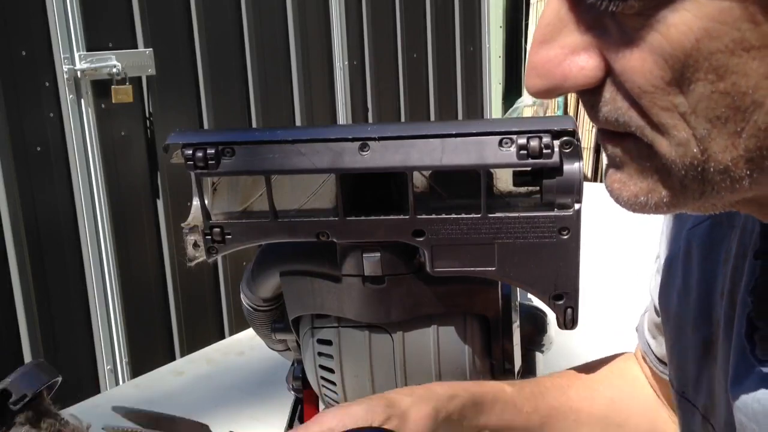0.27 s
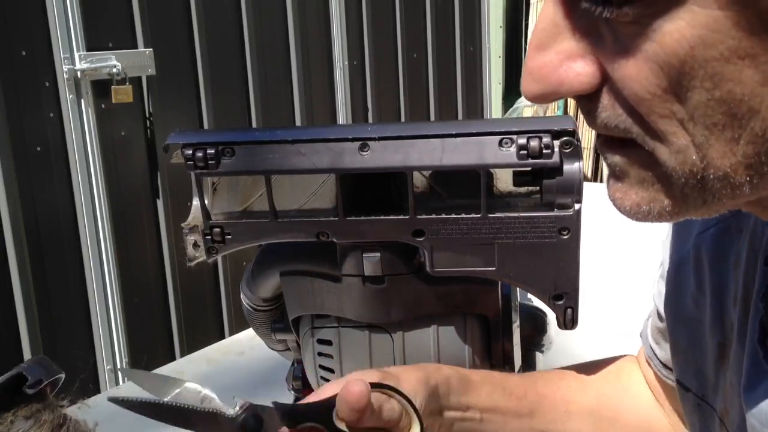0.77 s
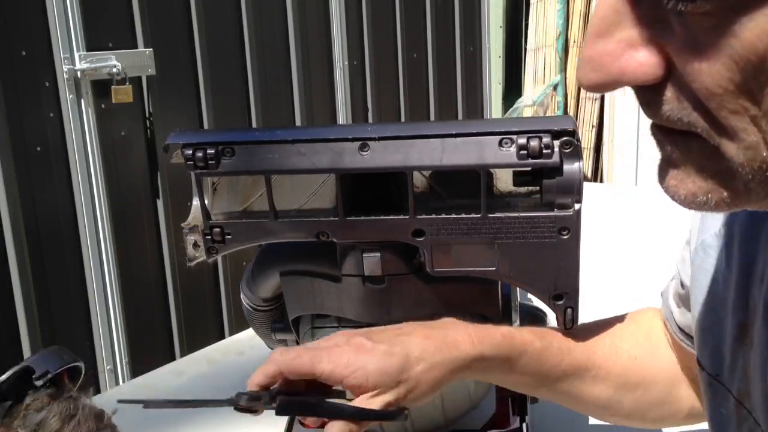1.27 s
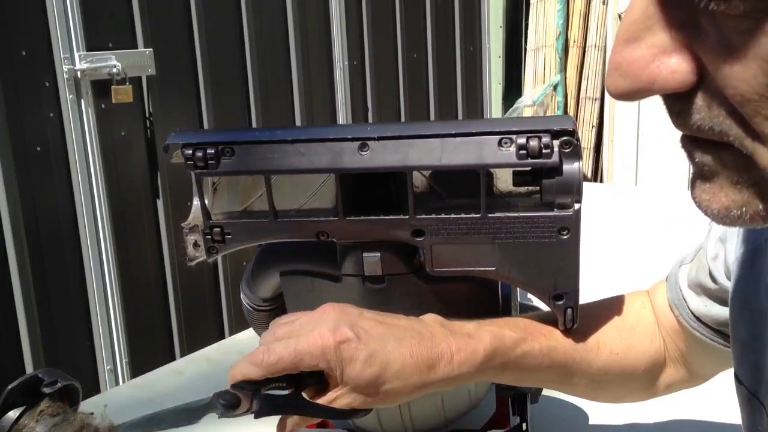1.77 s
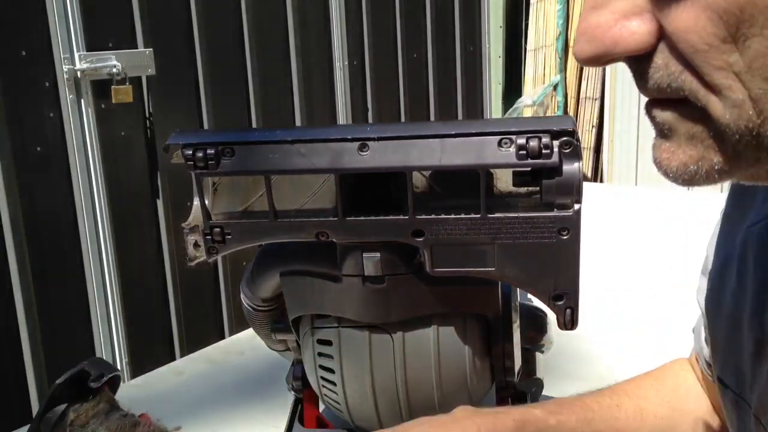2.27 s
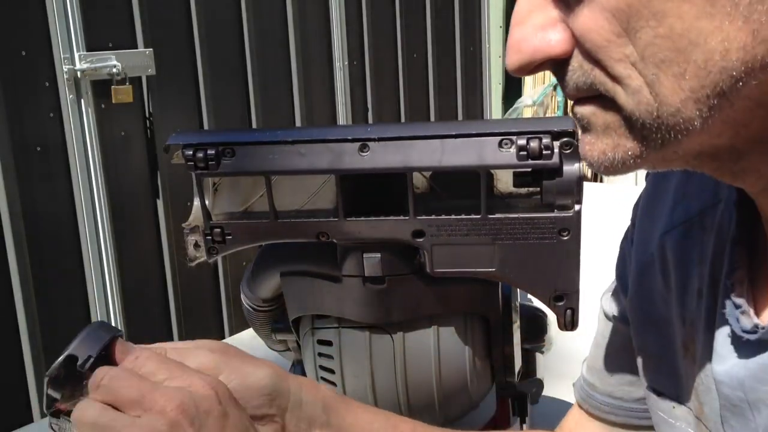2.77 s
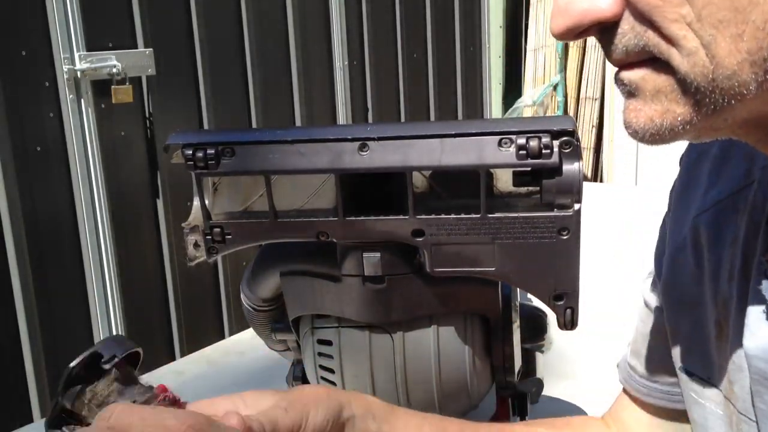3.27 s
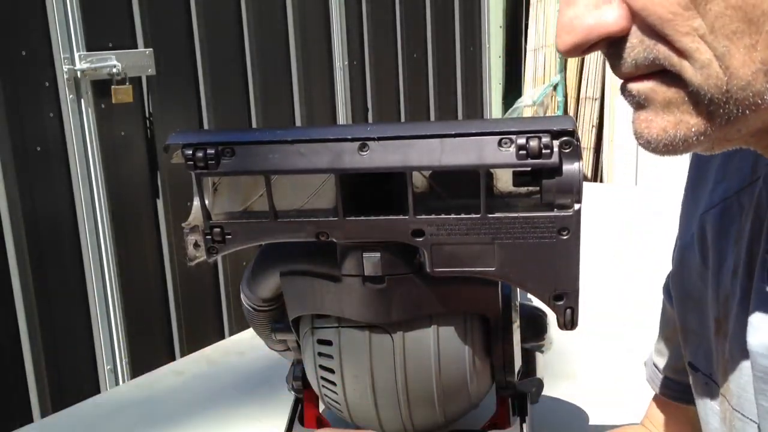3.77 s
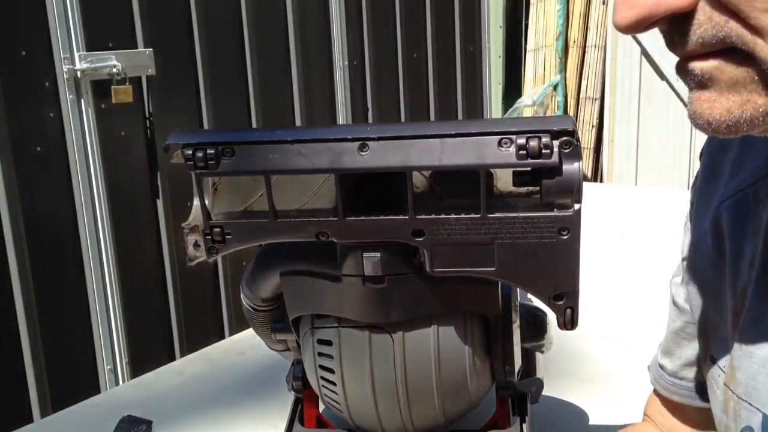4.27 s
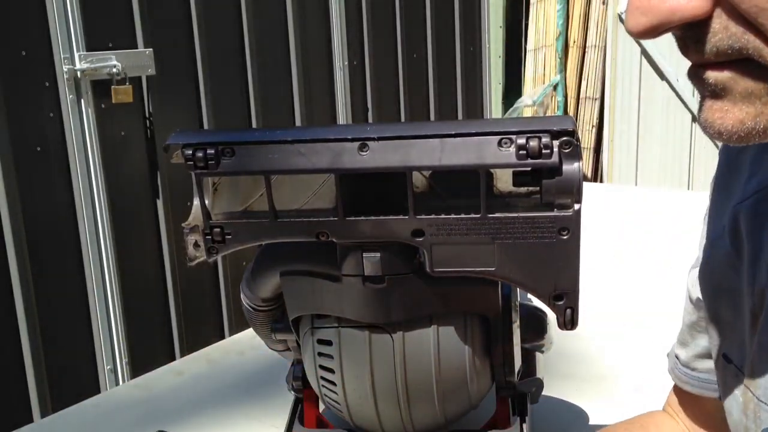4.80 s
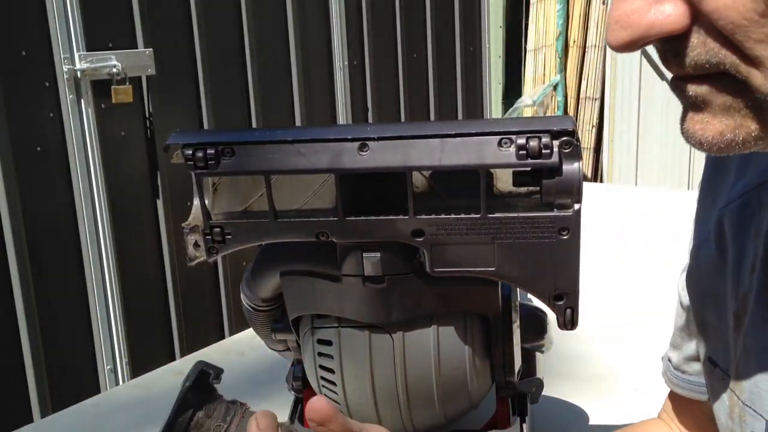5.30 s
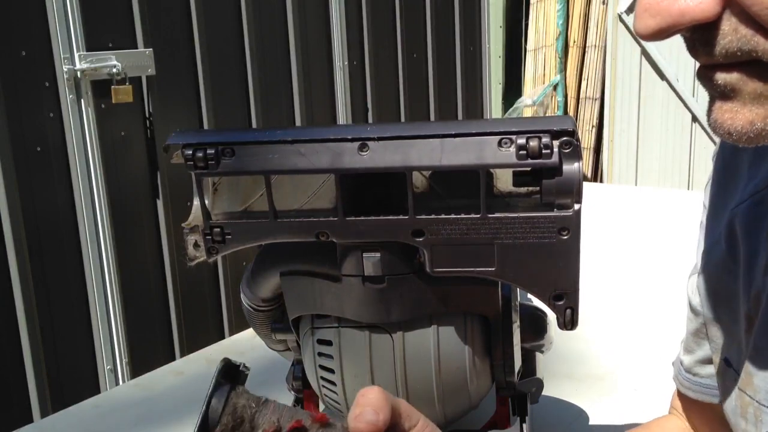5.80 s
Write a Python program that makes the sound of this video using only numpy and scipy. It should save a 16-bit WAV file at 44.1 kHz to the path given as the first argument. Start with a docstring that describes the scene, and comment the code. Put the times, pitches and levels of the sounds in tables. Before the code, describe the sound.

Short, sharp scissor snips and a clatter as they drop, followed by faint crackly hair tearing and a few plastic knocks outdoors.

```python
"""Scissors snip hair off a plastic brush bar, steel clicking on steel, and drop on a light table.
Fingers then tear the hair away in rubs and ticks; the bar slides and knocks on the table top.
Each impact excites damped normal modes, and friction radiates noise from many tiny slips.
Outdoors, a quiet yard hums behind it all, and a near wall reflects the clicks and blows."""
import sys
import numpy as np
from scipy import signal
from scipy.fft import rfft, irfft, next_fast_len
from scipy.io import wavfile
from scipy.ndimage import uniform_filter1d, map_coordinates

SR = 44100
rng = np.random.default_rng(int(sys.argv[2]) if len(sys.argv) > 2 else 0)


def unload_audio(sound):
    """Save the sound as a 16-bit wav file, at the path given as the first command line argument."""
    columns = np.transpose(np.atleast_2d(sound))
    # keep every value between -1 and 1, then stretch to whole-number steps
    steps = np.round(np.clip(columns, -1, 1) * 32767)
    wavfile.write(sys.argv[1], SR, steps.astype(np.int16))


N = 266628

# normal modes of the bar on the table: f/Hz, level/dB, T60/s
BAR_MODES = [(165, -24.5, 0.1), (298.7, -13, 0.12), (393, -1, 0.07), (643, 0.5, 0.055), (810, -10.5, 0.021),
             (1170, -9.5, 0.035), (1288, -7, .04), (1668, -18, 0.045), (1823, -7, .05), (2020, -18.5, .06),
             (2200, -18.5, .05), (2800, -19, .05)]


def amp(db):
    return 10 ** (np.asarray(db) / 20)


def unit(x):
    return x / np.sqrt(np.mean(x ** 2) + 1e-20)


def along(points, hz):
    """Interpolation of (f/Hz, value) points on a logarithmic frequency axis."""
    f, v = np.transpose(points)
    return np.interp(np.log(hz + 1), np.log(f + 1), v)


def filtered(x, response):
    """Linear filtering: the spectrum of x times a frequency response."""
    m = next_fast_len(len(x) + 8192)
    return irfft(rfft(x, m) * response(np.fft.rfftfreq(m, 1 / SR)), m)[:len(x)]


def noise(spectrum, size=N):
    """White noise shaped by (f/Hz, level/dB) points, then scaled to rms 1."""
    return unit(filtered(rng.standard_normal(size), lambda hz: amp(along(spectrum, hz))))


def wobble(rate):
    """Smooth random modulation: a spline with rate knots a second."""
    knots = rng.standard_normal(int(N * rate / SR) + 4)
    return map_coordinates(knots, [np.arange(N) * rate / SR])


def resonance(hz, centre_hz, q):
    """Response of a damped oscillator, gain 1 at its centre."""
    damping = 1j * hz * centre_hz / q
    return damping / (centre_hz ** 2 - hz ** 2 + damping)


def ringing(modes, t, scatter_db, slow=1, cutoff_hz=1e5):
    """Free vibration as a sum of damped modes; a soft blow barely excites those above the cutoff."""
    return sum(amp(db + rng.normal(0, scatter_db) - 60 * t / (t60 * slow)) / (1 + (hz / cutoff_hz) ** 2)
               * np.sin(2 * np.pi * hz * t) for hz, db, t60 in modes)


def add(track, s, sound):
    """Superposition of a sound on the track from time s."""
    part = track[round(s * SR):][:len(sound)]
    part += sound[:len(part)]


def click(t, hz, t60, q):
    """A transient: decaying noise through one broad resonance, without bass, peak rms 1."""
    burst = amp(-60 * t / t60) * rng.standard_normal(len(t))
    centre_hz = np.clip(hz, 500, 16000)
    burst = filtered(burst, lambda f: resonance(f, centre_hz, q) * (1j * f / (1j * f + 1500)) ** 2)
    return burst / np.sqrt(np.max(uniform_filter1d(burst ** 2, size=40)))


def yard():
    """Ambient noise: broadband hiss and far traffic drone, with the line spectrum of mains hum."""
    # course of the background: t/s, hiss level/dB, drone level/dB
    levels = [(0, -60.5, -66), (.7, -60.5, -64.5), (1.3, -60, -65), (1.6, -61, -66), (2.2, -61.5, -65),
              (2.6, -59, -64.5), (3.1, -60, -65.5), (3.6, -59, -66), (4.199, -59.5, -63.5),
              (4.75, -59.5, -66.5), (5.402, -58.5, -66), (6.05, -60.5, -65)]
    # spectra of hiss, traffic and mains: f/Hz, level/dB
    hiss = [(760, -37), (1300, -11.5), (1550, -8.5), (1720, -20), (2540, -3), (2880, -3.5), (3550, -3.5),
            (4320, -4.5), (4900, -5.5), (6710, -6), (7220, -2.5), (9870, -4.5), (13200, -5.5),
            (15200, -5.5), (15800, -16)]
    traffic = [(15, -64), (25, -33.5), (96, -16.5), (172, -10.5), (296, -8), (357, -8), (393, -9),
               (501, -4.5), (560, -8.5), (604, -4), (2200, -8), (2860, -35.5), (4840, -120)]
    mains = [(120, -85), (179, -82), (361, -84.5)]
    s, hiss_db, drone_db = np.transpose(levels)
    t = np.arange(N) / SR
    out = amp(np.interp(t, s, hiss_db) + .4 * wobble(10)) * noise(hiss)
    out += amp(np.interp(t, s, drone_db) + .8 * wobble(9)) * noise(traffic)
    for hz, db in mains:
        out += amp(db + 2.5 + wobble(5)) * np.sin(2 * np.pi * hz * t + 1.3 * wobble(18))
    return out


def wall(x):
    """Reflection: the near wall returns a delayed, thin, dull tail, formed by convolution."""
    delay_s, t60 = 0.025, 0.083
    t = np.arange(SR // 6) / SR
    tail = noise([(300, -24.5), (2000, 1.0), (6000, 2.0), (12000, -15.5)], len(t)) * amp(-60 * t / t60)
    return signal.fftconvolve(np.pad(x, (round(delay_s * SR), 0)), tail / np.linalg.norm(tail))[:N]


def narrow_hisses():
    """Narrow-band noise: faint hisses and whistles from rubbed hair and the sliding bar."""
    # noise bands: t/s, duration/s, f/Hz, level/dB, half-width/Hz
    bands = [(3.91, .045, 14500, -62, 500), (4.02, .14, 1650, -65, 20), (3.69, .36, 388, -68, 12),
             (3.57, .2, 7800, -65, 400)]
    out = np.zeros(N)
    for start, length, hz, db, width_hz in bands:
        swell = np.sqrt(np.abs(np.sin(np.linspace(0, np.pi, round(length * SR)))))
        band = filtered(rng.standard_normal(SR // 2), lambda f: np.exp(-((f - hz) / width_hz) ** 2))
        add(out, start, amp(db) * unit(band)[:len(swell)] * swell)
    return out


def sliding_bar():
    """Forced vibration: sliding friction drives the modes of the bar, over a low rumble."""
    t = np.arange(N) / SR
    start, end, jerk_s = 3.69, 4.18, 0.022
    sliding = uniform_filter1d(1. * ((t > start) & (t < end)), size=400)
    modes = lambda f: sum(amp(db / 5.3) * resonance(f, hz, q=11) for hz, db, _ in BAR_MODES)
    hum = unit(filtered(rng.standard_normal(N), lambda f: 0.21 * (f < 2000) + modes(f)))
    rumble = noise([(30, -34), (90, -3), (200, -2.0), (400, -17.5)]) * amp(-65 + 4.4 * wobble(15))
    friction = amp(np.interp(t, (start, end), (-73, -68)))
    jerk = amp(-57 - 20 * np.abs(t - start) / jerk_s)
    return sliding * ((friction + jerk) * hum + rumble)


def table_thuds():
    """Heavily damped modes of the table top give low, dull thuds, one under the bar's knock."""
    # thuds: t/s, level/dB, f/Hz
    thuds = [(1.953, -37, 208), (1.981, -47, 173), (2.438, -45.5, 188), (2.668, -34, 165),
             (3.297, -50.5, 178), (3.902, -53, 110.3), (4.354, -46.5, 126), (5.699, -31, 130),
             (5.737, -23.5, 217), (5.745, -31.5, 149.5), (5.912, -50.5, 201)]
    rise_s, t60 = 0.0047, 0.092
    out, t = np.zeros(N), np.arange(SR // 3) / SR
    for s, db, hz in thuds:
        phase = 2 * np.pi * hz * t
        swing = np.sin(phase) + 0.2 * np.sin(1.6 * phase) + 0.49 * np.sin(0.573 * phase)
        add(out, s, amp(db - 60 * t / t60) * (1 - np.exp(-(t / rise_s) ** 2)) * swing)
    return out


def blows(events, modes, shiver_db, low_hz, crack_db):
    """Impact excitation: the object rings and the table top shivers, its bass lasting longest."""
    # spectrum of the shivering top: f/Hz, level/dB
    top_spectrum = [(35, -42.5), (60, -17.5), (190, -20.5), (858, 3.5), (1220, -1.5), (1560, -4),
                    (2430, -5.5), (9200, -20), (12000, -40.5), (15600, -79), (22000, -120)]
    # decay of the top: f/Hz, T60/s
    top_decay = [(100, 0.38), (500, 0.078), (2000, 0.089), (8000, 0.12)]
    out, t = np.zeros(N), np.arange(SR // 5) / SR
    for s, db, cutoff_hz, slow in events:
        hz, frames, spectra = signal.stft(noise(top_spectrum, len(t)), SR, nperseg=128)
        decay = amp(-60 * frames / (slow * along(top_decay, hz)[:, None]))
        excitation = 1 / (1 + (hz[:, None] / cutoff_hz) ** 2)
        shiver = signal.istft(spectra * decay * excitation, SR, nperseg=128)[1][:len(t)]
        sound = ringing(modes, t, 0.8, slow, cutoff_hz) + amp(shiver_db) * shiver
        sound += amp(crack_db) * click(t, hz=1.5 * cutoff_hz, t60=0.016, q=1.3)
        add(out, s, amp(db - 6.5) * sound * (1 - np.exp(-t / 0.00073)))
    # a thin top radiates little bass
    return filtered(out, lambda f: (1j * f / (1j * f + low_hz)) ** 2)


def knocking_bar():
    """Impacts on the table set the plastic bar in free vibration."""
    # knocks: t/s, level/dB, cutoff f/Hz, factor on T60
    knocks = [(4.9533, 4, 1500, 0.67), (5.53, -10, 1501, 0.64), (5.6927, -7, 1805, 0.58)]
    return blows(knocks, BAR_MODES, shiver_db=-3, low_hz=170, crack_db=-19)


def rub(strokes, spectrum, slips_per_s, grain_db):
    """Stick-slip friction: tiny uneven slips over a hiss; rise and fall times span 20 dB of a stroke."""
    # low part of a rub: f/Hz, level/dB
    body_spectrum = [(300, -87), (700, -2.5), (1500, -1.5), (3000, -1), (5000, -39)]
    roundness, slip_s = 1.2, 0.0018  # roundness 1 gives a pointed swell, 2 a rounded one
    envelope, body, t = np.zeros(N), np.zeros(N), np.arange(N) / SR
    for s, db, rise, fall, body_db in strokes:
        force = amp(db - 20 * np.where(t < s, (s - t) / rise, (t - s) / fall) ** roundness)
        envelope += force
        body += force * amp(body_db)
    slipping = 0
    for centre_hz in (4500, 8000, 13000):  # thick, middle and fine strands slip independently
        slips = (rng.random(N) < slips_per_s / SR) * amp(grain_db * rng.standard_normal(N))
        grains = unit(signal.lfilter([1], [1, -np.exp(-1 / (slip_s * SR))], slips))
        band = lambda hz: amp(along(spectrum, hz)) * np.exp(-(np.log((hz + 1) / centre_hz) / .45) ** 2)
        slipping += filtered((grains + 1) * rng.standard_normal(N), band)
    return envelope * unit(slipping) + body * noise(body_spectrum)


def tearing_hair():
    """Friction of hair pulled off the bristles: sparse slips make a coarse rustle."""
    # pulls: peak t/s, level/dB, rise/s, fall/s, relative body level/dB
    pulls = [(2.88, -61.5, 0.29, .3, -17), (3.034, -52.5, 0.056, 0.054, -27),
             (3.252, -53.5, 0.08, 0.054, -13), (3.315, -58.5, 0.036, .03, -20),
             (3.696, -48.5, 0.0099, 0.024, -23), (3.72, -61.5, 0.34, 0.39, -23),
             (3.93, -61.5, 0.17, 0.11, -9.5), (4.012, -62, 0.033, 0.032, -21),
             (4.317, -31, 0.037, 0.033, -21), (4.384, -51.5, 0.027, 0.078, -8.5),
             (4.49, -56, 0.08, 0.027, -17), (4.646, -51, 0.062, 0.057, -19.5),
             (5.078, -45.5, .09, 0.042, -16), (5.206, -44, 0.014, 0.041, -14),
             (5.45, -49, 0.013, 0.043, -25.5), (5.532, -44.5, .016, 0.023, -24),
             (5.695, -40.5, 0.076, 0.049, -20.5), (5.79, -52.5, 0.035, .047, -9.5),
             (5.838, -56, 0.018, 0.15, -21), (5.908, -42, 0.029, 0.051, -8.5)]
    # spectrum of rubbed hair: f/Hz, level/dB
    spectrum = [(1180, -44), (2000, -5.5), (2700, 3.5), (2990, -7.5), (3230, -2), (3900, -9.5),
                (4320, -4.5), (5740, -6.5), (6410, -1.5), (7050, -4), (10200, -4), (11500, -8),
                (13100, -5.5), (15500, -12)]
    return rub(pulls, spectrum, slips_per_s=400, grain_db=7.0)


def snapping_strands():
    """Sudden release of tension: each hair or bristle lets go with one dry tick."""
    # loudest strands: t/s, level/dB, centre f/Hz
    snaps = [(2.6916, -45.5, 5810), (2.8854, -49.5, 8370), (3.0402, -40.5, 6450), (3.24, -46, 7900),
             (3.249, -45, 3300), (3.5559, -42.5, 7600), (3.695, -36, 8800), (3.7188, -43.5, 3730),
             (3.7195, -43, 8500), (3.737, -43, 10270), (3.7414, -42.5, 6570), (3.7631, -43, 7300),
             (3.78, -44, 10200), (3.8004, -48, 9900), (3.818, -43, 8820), (4.2747, -43, 7950),
             (4.2832, -36.5, 9100), (4.3031, -30, 13050), (4.3207, -30, 10300), (4.3803, -35.5, 5700),
             (4.3944, -37, 7270), (4.4007, -42, 5500), (4.4158, -41, 5800), (4.9965, -45.5, 12300),
             (5.016, -48, 7850), (5.037, -40, 7760), (5.0674, -38, 7940), (5.0824, -39.5, 5380),
             (5.1726, -41, 9060), (5.1784, -40.5, 7530), (5.2067, -37, 3840), (5.226, -38, 11300),
             (5.4517, -39.5, 4640), (5.453, -37, 8470), (5.6805, -41.5, 4550), (5.766, -44.5, 10550),
             (5.7833, -41.5, 4790), (5.8318, -47, 7300), (5.8386, -39, 7350), (5.8988, -41, 8100),
             (5.9044, -35.5, 3170), (5.935, -40.5, 10160)]
    # spells of picking at fainter strands: start t/s, end t/s, mean level/dB
    spells = [(2.94, 3.11, -47), (3.6, 3.69, -49), (3.819, 3.9, -51), (4.191, 4.28, -47), (5.79, 5.95, -46)]
    picks, picks_per_s, pick_hz = 20, 41, 8500
    out, t = np.zeros(N), np.arange(SR // 50) / SR
    ticks = list(snaps)
    for start, end, db in spells:
        times = start + (np.arange(picks) + rng.random(picks)) / picks_per_s
        size, pitch = rng.standard_normal((2, picks))
        levels = db + 0.5 * size - 100 * (times > end)  # inaudible past the end of the spell
        ticks += zip(times, levels, pick_hz * np.exp(.2 * pitch))
    for s, db, hz in ticks:
        add(out, s, amp(db) * click(t, hz, t60=.009, q=2.9))
    return out


def dropped_scissors():
    """Each landing and rebound excites the normal modes of the scissors on the table."""
    # landings: t/s, level/dB, cutoff f/Hz, factor on T60
    landings = [(2.1915, 0, 2700, 0.27), (2.203, -11, 2620, 0.65), (2.2935, -23, 1300, 0.43),
                (2.3175, -21.5, 1600, 0.29), (2.33, -35, 1000, 0.72), (2.345, -30.5, 1000, 0.86),
                (2.3602, 1, 1500, 0.32), (2.3652, 0.5, 2500, 0.43), (2.372, -8, 2500, 0.42),
                (2.3775, -20.5, 1800, 0.91), (2.3865, -7, 2500, 0.57), (2.4005, -21, 2500, 0.82)]
    # scissors on the table: f/Hz, level/dB, T60/s
    modes = [(198, -8.0, 0.055), (638.3, 2.0, 0.013), (1136, -4.0, 0.094), (1681, -15.5, 0.11),
             (2040, -20.0, 0.05), (2540, -14.5, 0.066), (3100, -21, 0.084), (3670, -15.0, 0.08),
             (4440, -11.5, 0.082), (4893, -27.0, 0.072), (315.3, -6, 0.15), (401, -4.5, 0.1),
             (1012, -6.0, 0.063)]
    return blows(landings, modes, shiver_db=3.5, low_hz=100, crack_db=-22.5)


def shearing_blades():
    """Friction of blades shearing hair: dense slips merge into a fine rasp."""
    # cuts: peak t/s, level/dB, rise/s, fall/s, relative body level/dB
    cuts = [(.033, -53, 0.026, .016, -12), (.153, -58, .005, .012, 1), (.178, -57, .02, .02, -9),
            (.272, -45, 0.014, 0.039, -4.5), (.648, -50, .012, 0.015, -11), (.69, -52, 0.01, .08, -22),
            (.742, -45, 0.014, 0.0047, -10.5), (.922, -46.5, .004, 0.032, -4.5),
            (1.107, -43.5, 0.02, 0.0043, -9), (1.503, -57, .02, .025, -13),
            (1.887, -36, 0.0082, 0.0055, -8), (1.915, -43.5, 0.026, 0.031, -25),
            (1.958, -39.5, 0.0084, 0.012, -4.5)]
    # spectrum of the rasp: f/Hz, level/dB
    spectrum = [(1180, -19), (2000, -20), (3320, -2.5), (3740, 2), (5890, -3.5), (6690, -2.5), (7230, -8),
                (10600, -3), (15500, -14)]
    return rub(cuts, spectrum, slips_per_s=1400, grain_db=8.5)


def snips():
    """Impact of steel on steel: a crack, free vibration of edges and blades, a loose pivot's rattle."""
    # blade and pivot clicks: t/s, level/dB, centre f/Hz, relative bite/dB, relative rattle/dB
    contacts = [(.147, -44, 3480, -16, -12), (0.466, -36.5, 5060, -26, -7), (.701, -43.5, 5000, -9, -14),
                (0.737, -52, 8150, -9, -24), (.741, -46, 4840, -21, -23), (.7417, -24.5, 10600, -28, -23),
                (.9176, -35, 3200, -15, -9), (1.082, -49, 9000, -8, -8), (1.1053, -34.5, 10930, -10, -9),
                (1.1794, -12, 5650, 7, -11.5), (1.2035, -37, 6400, -8, -10), (1.214, -44, 4240, -14, -12),
                (1.4605, -36, 3650, -22, -5.5), (1.7322, -44.5, 6300, -12, -9.5),
                (1.8864, -18, 13200, -26, -32), (1.911, -36.5, 7730, -6, -11),
                (1.929, -34.5, 6760, -1, -14), (1.956, -45, 10230, -9, -12),
                (1.9609, -37.5, 4280, -11, -11), (2.192, -16.5, 3946, -8.5, -5.5),
                (2.2025, -25.5, 8500, 3.5, -23), (2.207, -30.5, 7840, -3.5, -18.5),
                (2.286, -38, 9030, -7.5, -13.5), (2.294, -43.5, 4424, -5, -13.5),
                (2.317, -47.5, 3520, -9.5, -16), (2.365, -10, 6830, 2, -5), (2.372, -22, 8020, -6, -7),
                (2.3868, -15.5, 4940, -4.5, -14), (2.4, -34, 3540, -1.5, -13), (2.4956, -41, 3280, 2.5, -7)]
    # modes of the meeting edges and of the blades: f/Hz, level/dB, T60/s
    edge_modes = [(2030, -14, .012), (2750, -9, .012), (5950, 0, .009), (6900, -3, .009), (9200, -9, .006),
                  (12600, -5, .007), (14300, -9, .005)]
    blade_modes = [(2029, -19.5, 0.058), (2820, 1.5, 0.071), (3870, 3.5, 0.017), (4310, -7.5, 0.05),
                   (4940, -32, 0.031), (6700, -2.5, 0.026), (9600, -13, .03), (12080, -23, .035)]
    # spectrum of the pivot's rattle: f/Hz, level/dB
    pivot = [(470, -47.5), (800, -16), (1420, -18), (1600, -22), (1810, -13.5), (3130, -6), (4320, -3.5),
             (13000, -17.5), (15500, -24.5)]
    rattle_t60 = .058
    out, t = np.zeros(N), np.arange(SR // 10) / SR
    for s, db, hz, bite_db, rattle_db in contacts:
        bite = amp(bite_db) * ringing(edge_modes, t, scatter_db=1) * (1 - np.exp(-t / .0006))
        ring_db = -12 - 18 * np.log2(hz / 4000)  # brighter clicks ring less
        ring = amp(ring_db) * ringing(blade_modes, t, scatter_db=2)
        rattle = noise(pivot, len(t)) * amp(rattle_db - 60 * t / rattle_t60) * (1 - np.exp(-t / 0.00067))
        crack = click(t, hz, t60=0.004, q=0.52)
        add(out, s, amp(db) * (crack + bite + ring + rattle))
    # thin blades radiate no bass
    return filtered(out, lambda f: (1j * f / (1j * f + 700)) ** 3)


def scene():
    """Superposition of all sources in one channel; only the hard impacts reflect from the wall."""
    impacts = snips() + dropped_scissors() + knocking_bar()
    rubs = shearing_blades() + tearing_hair()
    mix = impacts + amp(-29.5) * wall(impacts) + rubs + snapping_strands()
    return (mix + table_thuds() + sliding_bar() + narrow_hisses() + yard())[None]


def record(dry):
    """Clipping at full scale, then band limiting: the treble fades just under the limit."""
    fade_hz, limit_hz = 15600, 16400
    clipped = np.clip(dry[0], -1, 1)
    fade_db = lambda hz: -20 / (1 + np.exp((fade_hz - hz) / 90))
    return filtered(clipped, lambda hz: (hz < limit_hz) * amp(fade_db(hz)))[None]


dry = scene()
out = record(dry)
unload_audio(out)
```